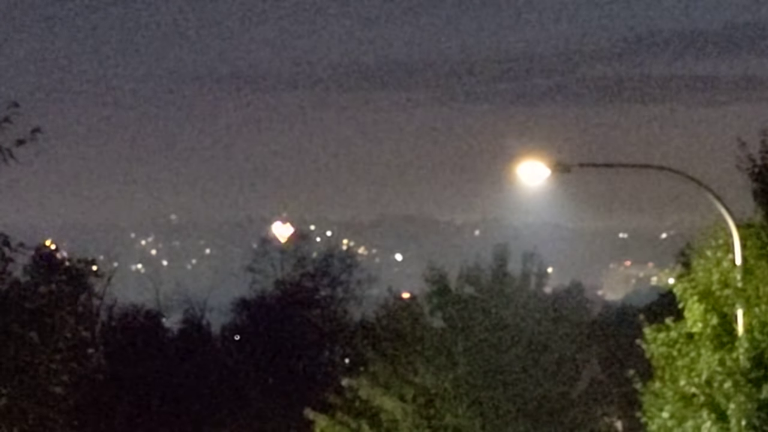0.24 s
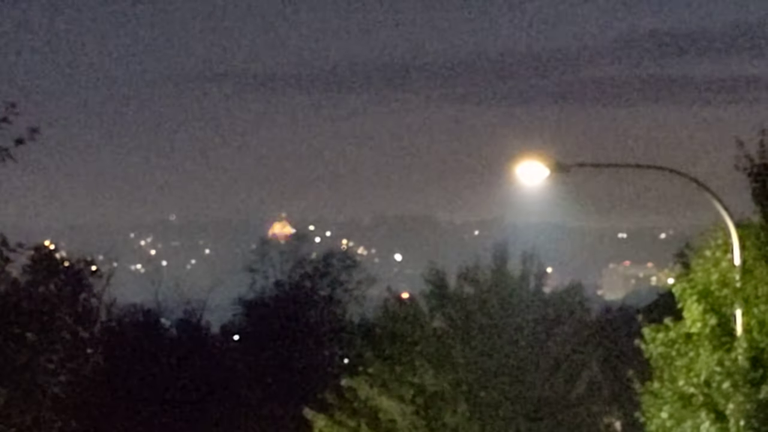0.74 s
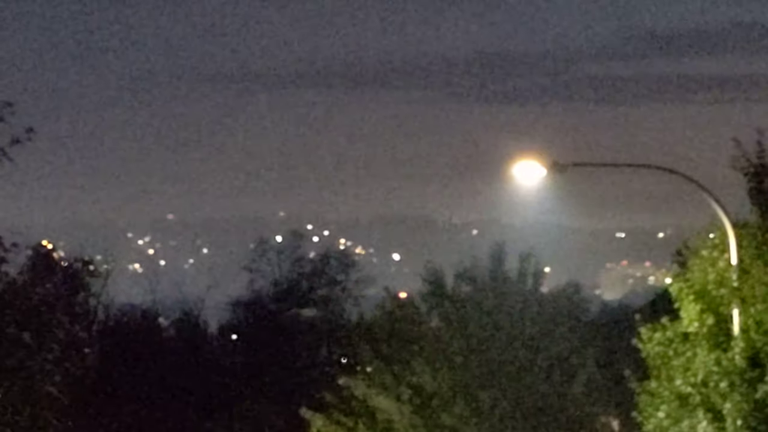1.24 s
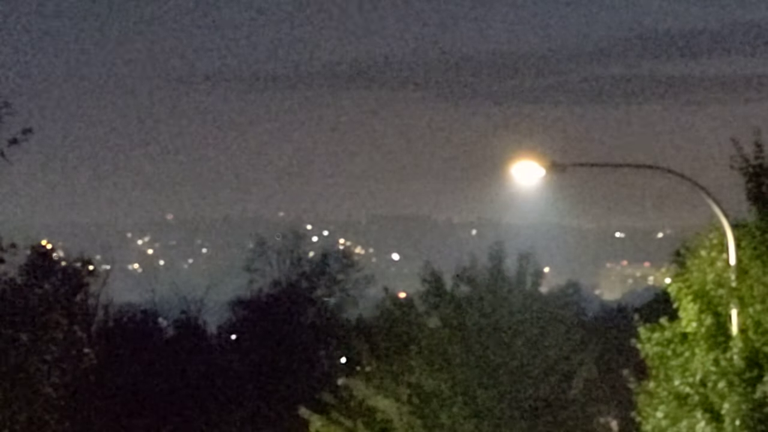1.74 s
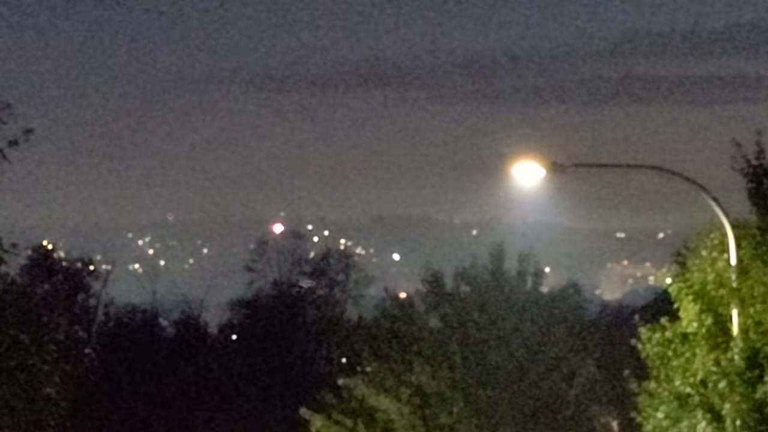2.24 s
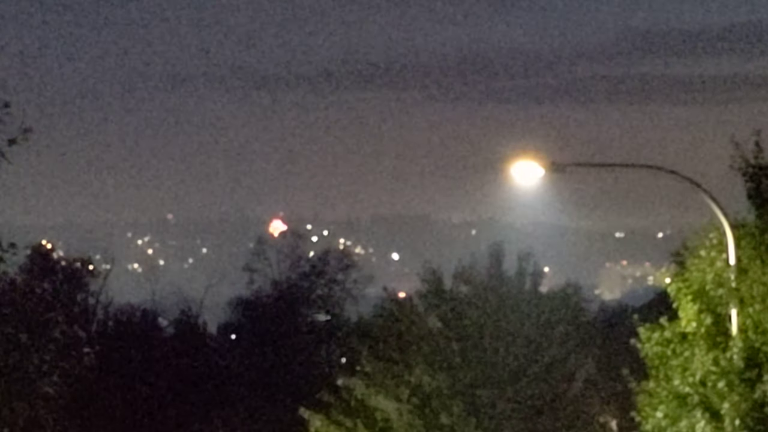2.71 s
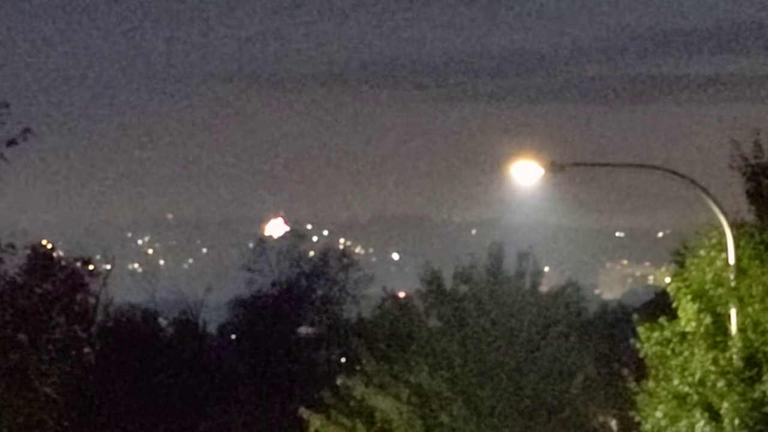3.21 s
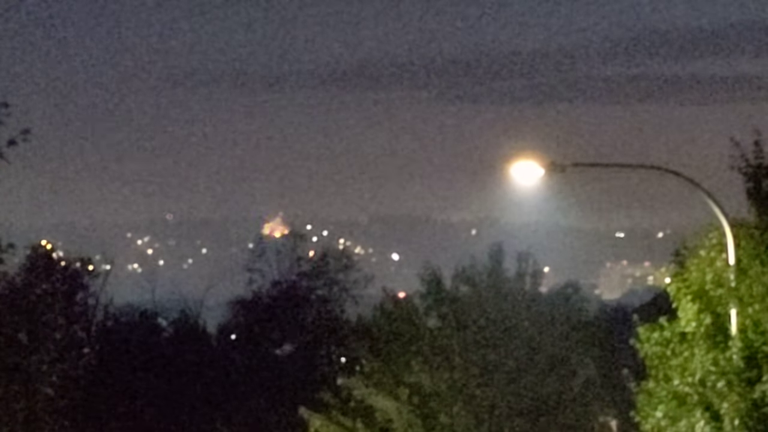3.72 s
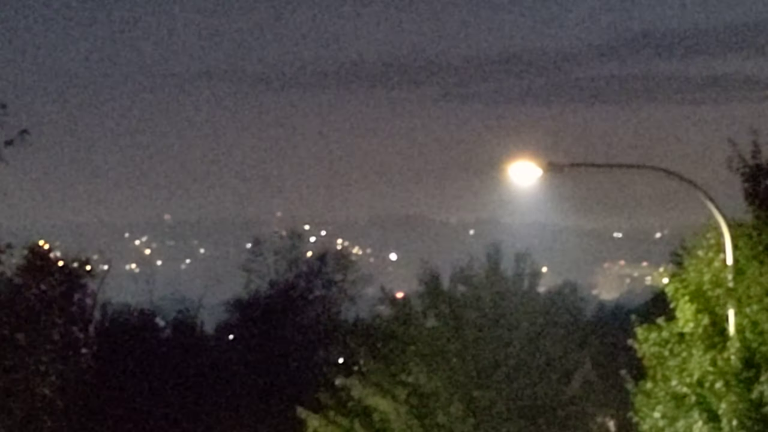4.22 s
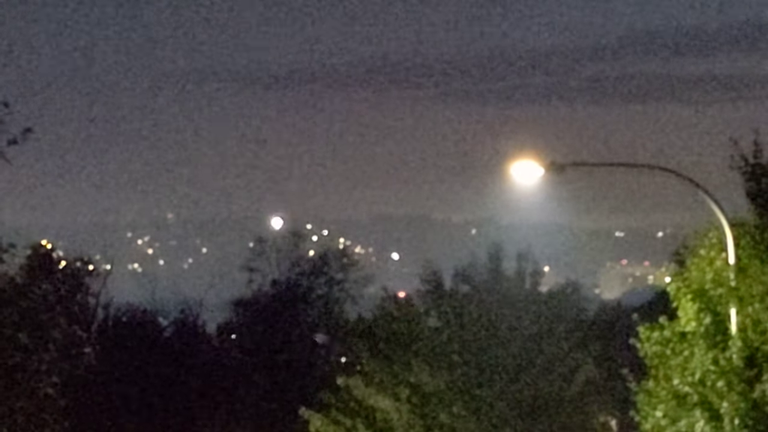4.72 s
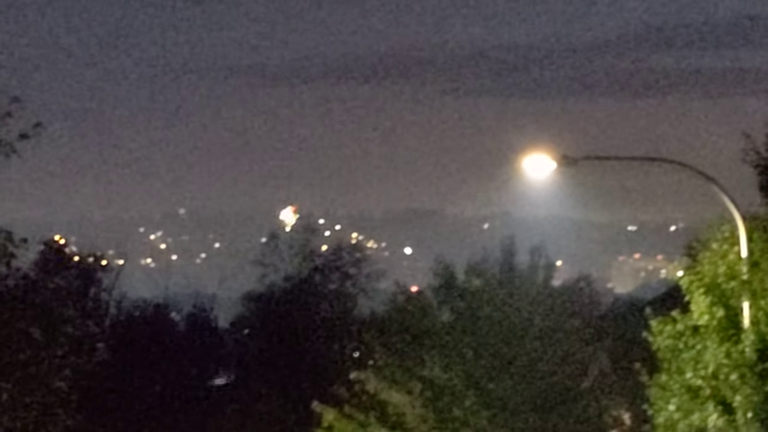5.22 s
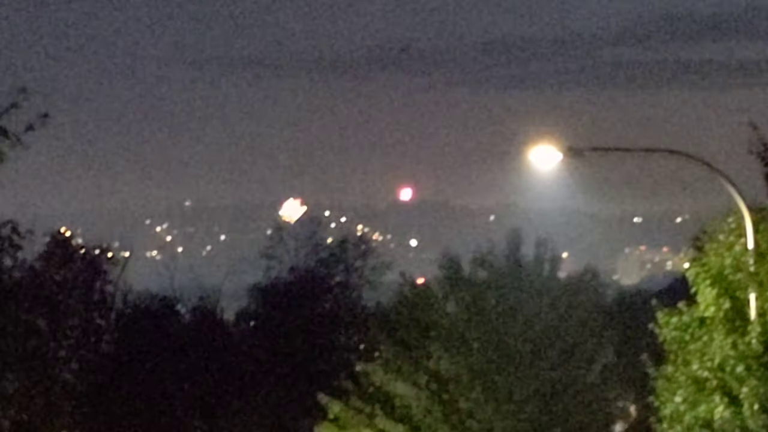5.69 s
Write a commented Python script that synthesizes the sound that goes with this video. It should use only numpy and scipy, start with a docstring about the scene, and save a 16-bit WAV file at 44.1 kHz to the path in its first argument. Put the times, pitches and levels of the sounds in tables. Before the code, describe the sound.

Far-off firework bangs boom from the right, bounce off walls on the left and roll away over soft city hum and passing cars.

```python
"""Fireworks burst far away over a city at night, heard from a hillside.
Each burst is a deep thump (a few swelling sine cycles), a deeper boom and a dull crack (short noise), first
straight from the right, then off walls on the left. Noise tails scatter and roll away after it, and far slopes
throw back duller bangs. Low thuds and a few small pops (short sines) join in.
Under it lie the hum of the city, tyres, the swish of passing cars and a faint hiss, all shaped noise."""
import sys
import numpy as np
from scipy import signal
from scipy.fft import rfft, irfft, next_fast_len
from scipy.io import wavfile

SR = 44100
rng = np.random.default_rng(int(sys.argv[2]) if len(sys.argv) > 2 else 0)


def log_audio(samples):
    """Write samples as a 16-bit WAV file to the path given in sys.argv[1]."""
    # one column per channel
    frames = np.atleast_2d(samples).T
    # limit to full scale, then quantise
    limited = np.clip(frames, -1, 1)
    pcm = np.round(limited * 32767).astype(np.int16)
    wavfile.write(sys.argv[1], SR, pcm)


N = 262395
TIME = np.arange(N) / SR
LEAD_S = 0.025  # silence ahead of each front
CRACK_S_PER_CYCLE = 0.012  # the more a front is smeared, the longer its crack


def amp(db):
    """Turns decibels into a gain."""
    return 10 ** (np.asarray(db) / 20)


def unit(x):
    """Scales to an rms of one."""
    return x / np.sqrt(np.mean(x ** 2) + 1e-20)


def read(points, hz):
    """Reads a table of frequencies and values on a log-frequency axis."""
    table_hz, value = np.transpose(points)
    return np.interp(np.log(hz + 1), np.log(table_hz), value)


# How alike left and right are in the bangs, their tails and the hiss: (frequency [Hz], correlation [-1 to 1])
BANG_LIKENESS = [(70, 0.93), (150, 0.82), (260, 0.43), (600, 0.8), (900, 0.024), (1250, -0.29),
                 (1550, 0.073), (2000, 0.39), (2600, -0.0045)]


def noise(spectrum, level=1, size=N, tilt_db=0, treble_db=0, likeness=BANG_LIKENESS):
    """Stereo noise that follows a level and is then coloured; the ears are most alike in the bass."""
    count = 2 * next_fast_len(size // 2 + SR // 10)
    hz = np.fft.rfftfreq(count, 1 / SR)
    a, b = rfft(rng.standard_normal((2, size)) * level, count)
    same = np.clip(read(likeness, hz), -.99, .99)
    mid = a * np.sqrt((1 + same) / 2)
    side = b * np.sqrt((1 - same) / 2)
    shelf = np.clip(np.log2((hz + 1) / 2300), 0, 1)  # the treble setting acts fully one octave above 2300 Hz
    colour_db = read(spectrum, hz) + tilt_db * np.log2(hz + 1) + treble_db * shelf
    colour = unit(amp(colour_db))
    return irfft(np.array([mid + side, mid - side]) * colour)[:, :size]


def flutter(rate_hz, depth_db):
    """A gain that wanders at random between new values, with an rms of one."""
    knots = rng.standard_normal(2000)
    return unit(amp(depth_db * np.interp(TIME * rate_hz, np.arange(len(knots)), knots)))


def add(mix, s, sound):
    """Mixes a stereo sound in at a time, which may lie before the start."""
    at = int(s * SR)
    sound = sound[:, max(-at, 0):]
    part = mix[:, max(at, 0):][:, :sound.shape[1]]
    part += sound[:, :part.shape[1]]


def front_time():
    """Time since a front arrived, with a short silence before it."""
    return np.maximum(np.arange(SR // 4) / SR - LEAD_S, 0)


def thump(db, hz, cycles, pan_db=0):
    """Distance rounds a blast to a few slow cycles; from the side, the nearer ear hears its wave ahead and louder."""
    roundness = 3.45  # how tightly the thump swells
    ear_lead_s_per_db = 0.000097  # time lead that goes with a level lead
    t = front_time()
    sides_db = np.array([[1], [-1]]) * pan_db / 2  # left, right
    u = t * hz / cycles
    swell = (u * np.exp(1 - u)) ** roundness
    wave = np.sin(2 * np.pi * hz * (t + ear_lead_s_per_db * sides_db))
    return amp(db + sides_db) * swell * wave


# Spectrum of the crack: (frequency [Hz], relative level [dB per Hz])
CRACK_SPECTRUM = [(30, -26), (70, -10), (290, 7), (480, -5.5), (620, -3.5), (830, -9.5), (1500, -5),
                  (2100, -15), (2700, -19.5), (3400, -33.5), (5000, -51.5), (9000, -74)]


def crack(db, decay_s, treble_db):
    """The short dull crack on a pressure front: noise that rises fast and dies away."""
    t = front_time()
    snap = (1 - np.exp(-t / 0.0013)) * np.exp(-t / decay_s)
    return amp(db) * noise(CRACK_SPECTRUM, snap, size=len(t), treble_db=treble_db)


# Shell bursts; the paths below add to the thump, boom and crack levels:
# (time [s], thump level [dB], thump pitch [Hz], boom level [dB], crack level [dB], crack level off the walls [dB],
#  treble [dB], scatter level [dB], scatter swell [s], scatter time to fall 60 dB [s],
#  scatter tilt [dB per octave], long roll level [dB])
SHELL_BURSTS = [ (-0.04, -46, 240, -52, -42, -43, -13, -40.3, 0.035, 1.35, 2.5, -55),
                (1.320, -15.3, 223, -16, -28.5, -28, -10.5, -28, 0.11, 0.78, -0.6, -40),
                (1.862, -15.5, 247, -42, -40.5, -49, 3, -31.8, 0.045, .68, 0, -37.2),
                (4.712, -14, 184.5, -17, -25.5, -21.5, -3, -31.2, 0.045, 1.03, 3, -34),
                (5.288, -25.5, 263, -47, -38.5, -38, 3.5, -38, 0.038, 0.96, 2, -52)]
# The ways every burst arrives, straight from the right, then off two walls on the left:
# (delay [s], thump level [dB], boom level [dB], boom pitch [Hz], cycles to the crest [count],
#  crack level [dB], left over right [dB])
BURST_PATHS = [(0, 0, 0, 118, 1.1, -0.5, -8.5), (0.034, -12, 3.5, 88, 0.62, 2.5, 6),
               (0.045, -7, 3, 144, 1.95, -12, 6)]


def bursts():
    """Each shell sends a thump, a deeper boom and a crack along the same three paths."""
    boom_lag_s, boom_pan_share = 0.0059, 0.52  # the boom trails the direct front and leans less to one side
    out = np.zeros((2, N))
    for s, thump_db, hz, boom_db, direct_crack_db, wall_crack_db, treble_db, *_ in SHELL_BURSTS:
        for delay, path_thump_db, path_boom_db, boom_hz, cycles, path_crack_db, pan_db in BURST_PATHS:
            crack_db = wall_crack_db if delay else direct_crack_db
            front = thump(thump_db + path_thump_db, hz, cycles, pan_db)
            front += crack(crack_db + path_crack_db, CRACK_S_PER_CYCLE * cycles, treble_db)
            add(out, s + delay - LEAD_S, front)
            boom = thump(boom_db + path_boom_db, boom_hz, cycles, boom_pan_share * pan_db)
            add(out, s + max(delay, boom_lag_s) - LEAD_S, boom)
    return out


# The bright wash behind the thud with the sharpest crack:
# (treble [dB], scatter level [dB], swell [s], time to fall 60 dB [s], tilt [dB per octave], long roll level [dB])
BRIGHT_WASH = (9.5, -47, 0.06, 1.6, 3.6, -45.5)


def tails():
    """Lists when each tail starts and how it sounds: one per burst, and the bright wash."""
    return [(s, *tail) for s, _, _, _, _, _, *tail in SHELL_BURSTS] + [(4.364, *BRIGHT_WASH)]


# Spectrum of the scatter, before each tail's tilt and treble: (frequency [Hz], relative level [dB per Hz])
SCATTER_SPECTRUM = [(25, -37.5), (42, 2), (65, -3), (200, 3), (300, -2.5), (450, -8.5), (700, -12),
                    (1000, -16.5), (1500, -22), (2100, -27.5), (2700, -37), (3400, -47.5), (5500, -66.5),
                    (9000, -91.5)]


def scatter():
    """Nearby houses and trees scatter each burst into noise that swells, holds and dies away."""
    hold = 1.56  # the fall starts after this many swell times
    out = np.zeros((2, N))
    for s, treble_db, scatter_db, swell_s, t60_s, tilt_db, _ in tails():
        t = np.maximum(TIME - s, 0)
        rise = np.minimum(t / swell_s, 1) ** .5
        fall_db = 60 * np.maximum(t - swell_s * hold, 0) / t60_s
        level = rise * amp(scatter_db - fall_db)
        out += noise(SCATTER_SPECTRUM, level, tilt_db=tilt_db, treble_db=treble_db)
    return out * flutter(rate_hz=67, depth_db=3.0)


# Spectrum of the long roll: (frequency [Hz], relative level [dB per Hz])
ROLL_SPECTRUM = [(25, -39), (55, -7), (120, -4), (220, -1), (310, -5), (450, -18.5), (700, -18),
                 (1400, -22.5), (2200, -36.5), (3200, -53), (6000, -78)]


def long_roll():
    """Far hills return a long, low, lumpy roll: the powers of all tails add up in one noise."""
    rise_s, t60_s = 0.085, 5.11
    power = np.zeros(N)
    for s, *_, roll_db in tails():
        t = np.maximum(TIME - s, 0)
        level = (1 - np.exp(-t / rise_s)) * amp(roll_db - 60 * t / t60_s)
        power += level ** 2
    return noise(ROLL_SPECTRUM, np.sqrt(power)) * flutter(rate_hz=28, depth_db=3.0)


# How alike left and right are in the city and its traffic: (frequency [Hz], correlation [-1 to 1])
CITY_LIKENESS = [(80, 0.93), (220, 0.69), (350, 0.51), (560, 0.84), (1020, 0.76), (1300, 0.088),
                 (1650, 0.17), (2000, .55), (2600, 0.14)]
# Spectrum of the city hum: (frequency [Hz], relative level [dB per Hz])
HUM_SPECTRUM = [(20, -43), (30, -32), (45, -1), (70, 2.5), (200, 0), (400, -9.5), (750, -12.5), (1000, -10),
                (1400, -15), (2000, -30), (2600, -38), (3300, -50.5), (6000, -72)]


def city_hum():
    """The steady low hum of the city."""
    return amp(-47.6755) * noise(HUM_SPECTRUM, likeness=CITY_LIKENESS)


# Spectrum of the far tyres: (frequency [Hz], relative level [dB per Hz])
TYRE_SPECTRUM = [(300, -24.5), (560, -1), (780, -10.5), (1030, 3.5), (1250, -11), (1500, -10), (2200, -29),
                 (4000, -52)]
# Loudness of the far tyres: (time [s], level [dB])
TYRE_LEVELS = [(0, -66), (1.2, -59), (2.4, -61.5), (2.9, -51), (3.4, -56.5), (4.1, -59), (5.95, -63)]


def far_tyres():
    """Far traffic that comes and goes: noise along a slowly moving level."""
    level_db = np.interp(TIME, *np.transpose(TYRE_LEVELS))
    return noise(TYRE_SPECTRUM, amp(level_db), likeness=CITY_LIKENESS)


# Spectrum of the car swish: (frequency [Hz], relative level [dB per Hz])
SWISH_SPECTRUM = [(500, -26.5), (1200, 2.5), (2000, -1), (2600, -10), (3300, -24), (5000, -44)]
# Passing cars: (time at the loudest [s], level [dB], half length [s])
CAR_PASSES = [(0.85, -55, 0.23), (2.265, -62.5, 0.29), (4.227, -62, 0.092), (5.5, -67, 0.67)]


def passing_cars():
    """The swish of each passing car swells and fades."""
    power = sum(amp(db) ** 2 / (1 + ((TIME - s) / half_s) ** 2) ** 2 for s, db, half_s in CAR_PASSES)
    return noise(SWISH_SPECTRUM, np.sqrt(power), likeness=CITY_LIKENESS)


# Spectrum of the hiss: (frequency [Hz], relative level [dB per Hz])
HISS_SPECTRUM = [(500, 3.5), (3500, 3), (4300, 4), (5000, -0.5), (5500, 2), (6300, -1.5), (7100, 0.5),
                 (8200, -3), (9600, -1), (10700, -7), (12000, -5.5), (15500, -12)]


def faint_hiss():
    """A faint even hiss: steady noise."""
    return amp(-75.1755) * noise(HISS_SPECTRUM)


# Bangs thrown back by far slopes:
# (time [s], thump level [dB], pitch [Hz], cycles to the crest [count], crack level [dB], wall echo level [dB])
SLOPE_BANGS = [ (0.033, -42, 560, 0.84, -33.5, -20), (0.155, -41, 200, 3.2, -47, -6),
               (1.406, -22, 240, 5.4, -35.5, 3.5), (2.288, -35, 232, 2.8, -43, -3),
               (2.568, -36, 220, 2.3, -54, -10), (2.614, -37, 390, 2.9, -52, -12),
               (4.892, -34, 225, 1.2, -34.5, 5), (4.985, -26, 198, 1.2, -38, -9)]


def slope_echoes():
    """Smeared, duller bangs come back from the right; a wall on the left repeats each, mostly lower but
    sometimes louder."""
    out = np.zeros((2, N))
    for s, thump_db, hz, cycles, crack_db, wall_db in SLOPE_BANGS:
        # delay s, level dB, pitch ratio, left over right dB
        straight = (0, 0, 1, -6.5)
        off_wall = (0.036, wall_db, 0.82, 5.5)
        for delay, db, ratio, pan_db in (straight, off_wall):
            front = thump(thump_db + db, hz * ratio, cycles, pan_db)
            front = front + crack(crack_db + db, CRACK_S_PER_CYCLE * cycles, treble_db=-15.5)
            add(out, s + delay - LEAD_S, front)
    return out


# Low thuds from straight ahead: (time [s], thump level [dB], pitch [Hz], crack level [dB], treble [dB])
LOW_THUDS = [(1.357, -20.5, 62, -45, -7), (1.471, -20.5, 68, -46, -2), (3.464, -36.5, 184, -56, -6),
             (4.366, -19.5, 99, -37, 20), (4.438, -15.3, 84, -41.5, 0), (4.815, -24, 150, -40, 4)]


def thuds():
    """Single low pushes of air, alike in both ears, each with a faint crack and a soft smeared echo."""
    echo_s, echo_db = 0.035, -18.5
    out = np.zeros((2, N))
    for s, thump_db, hz, crack_db, treble_db in LOW_THUDS:
        push = thump(thump_db, hz, cycles=1.02)
        add(out, s - LEAD_S, push + crack(crack_db, 0.02, treble_db))
        add(out, s + echo_s - LEAD_S, thump(thump_db + echo_db, hz, cycles=2.4))
    return out


# Small dry pops: (time [s], level at the top of the swell [dB])
SMALL_POPS = [(2.494, -31.3), (3.554, -36), (3.607, -34.5), (3.834, -35.5), (3.972, -34.5), (4.271, -37)]


def pops():
    """Small reports with no bass and no tail: a few cycles of a swelling and fading sine."""
    t = np.arange(SR // 20) / SR
    u = t / .0014  # the crest comes after 1.4 ms
    swell = (u * np.exp(1 - u)) ** 2
    out = np.zeros(N)
    for s, level_db in SMALL_POPS:
        hz = rng.uniform(504, 548.8)
        out[int(s * SR):][:len(t)] += amp(level_db) * swell * np.sin(2 * np.pi * hz * t)
    return out


def scene():
    """Bursts and their echoes over the night city."""
    fireworks = bursts() + scatter() + long_roll()
    city = city_hum() + far_tyres() + passing_cars() + faint_hiss()
    return fireworks + city + slope_echoes() + thuds() + pops()


def record(dry):
    """The microphone drops the deepest bass; then a low-pass filter limits the treble."""
    bass_cut = signal.butter(8, 39, "highpass", fs=SR, output="sos")
    lean = signal.sosfilt(bass_cut, dry)
    treble_limit = signal.firwin(511, 15700, window=("kaiser", 9), fs=SR)
    return signal.oaconvolve(lean, treble_limit[None], "same")


dry = scene()
out = record(dry)
log_audio(out)
```